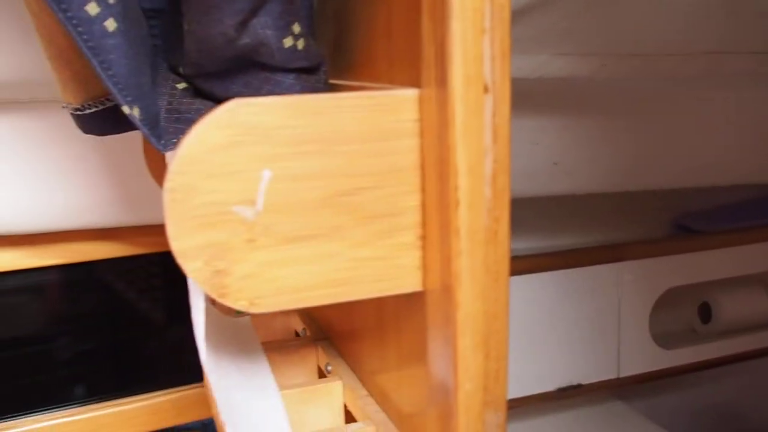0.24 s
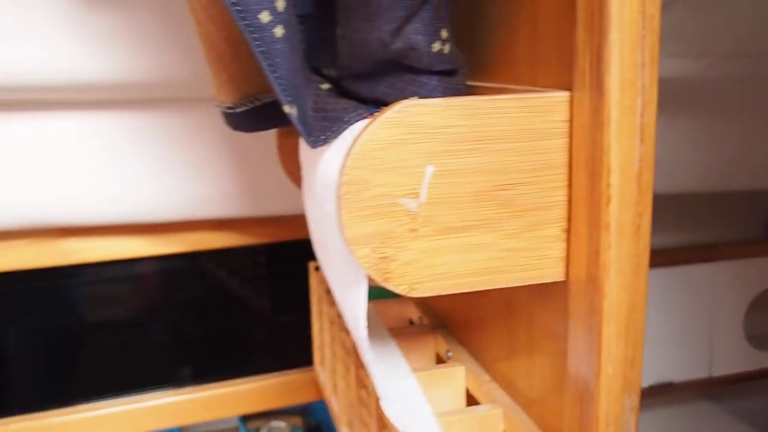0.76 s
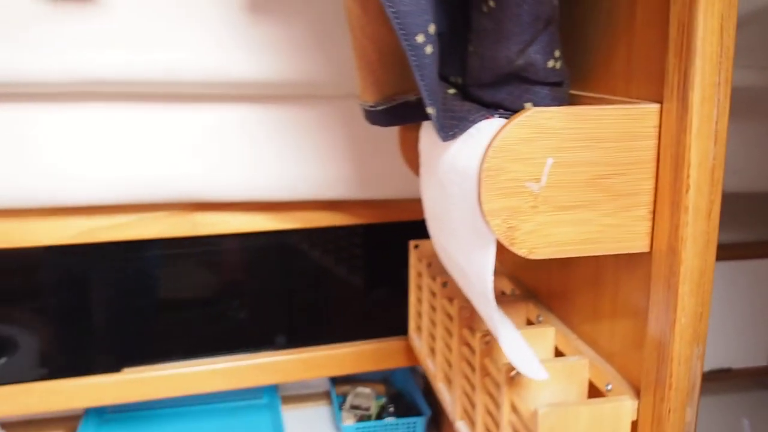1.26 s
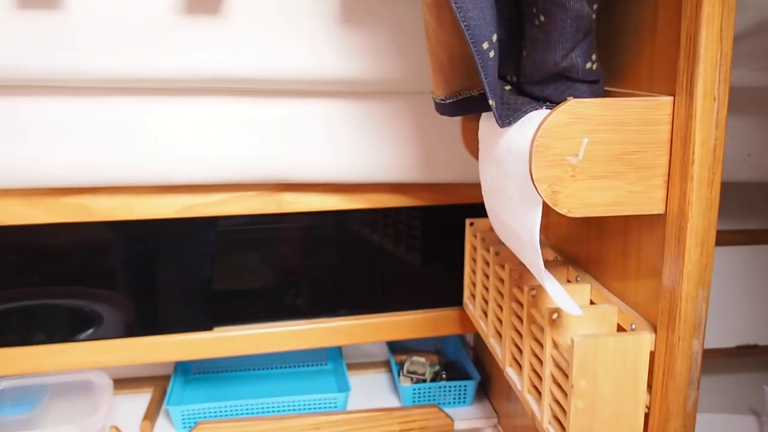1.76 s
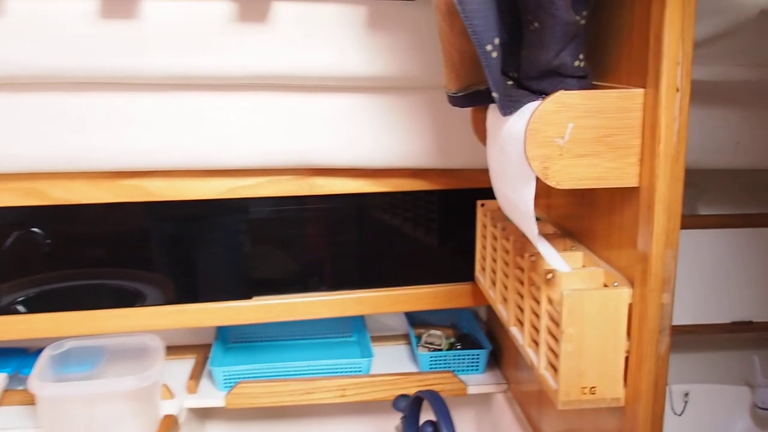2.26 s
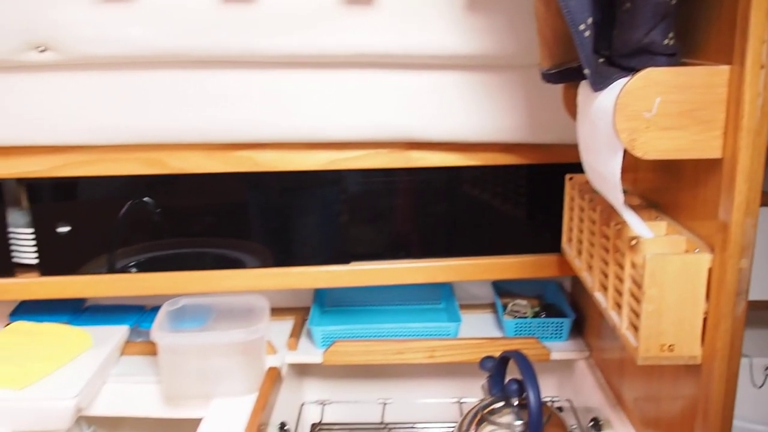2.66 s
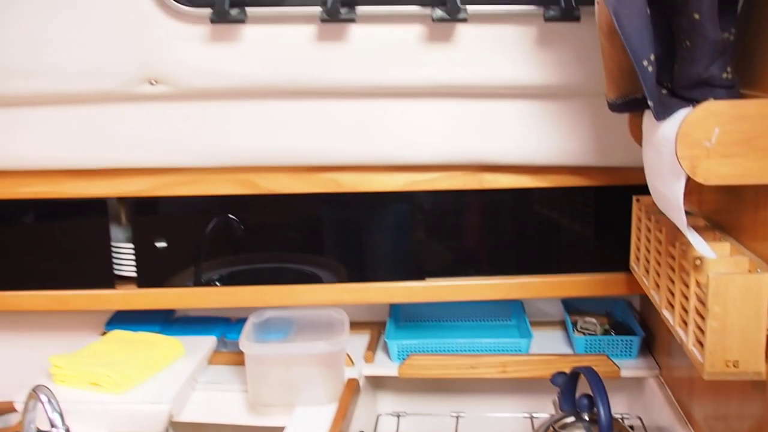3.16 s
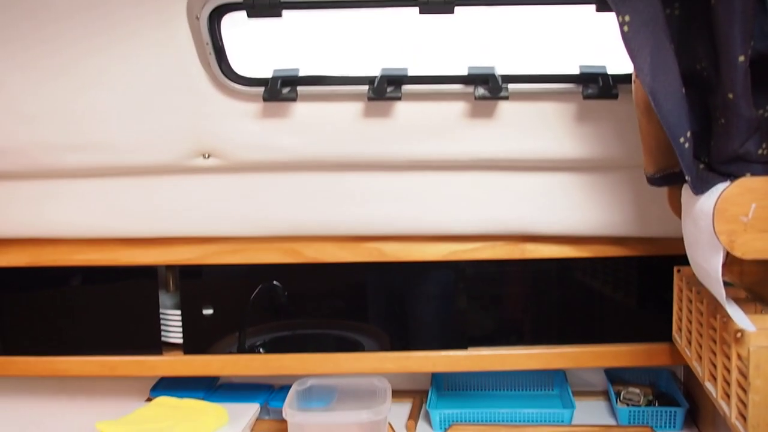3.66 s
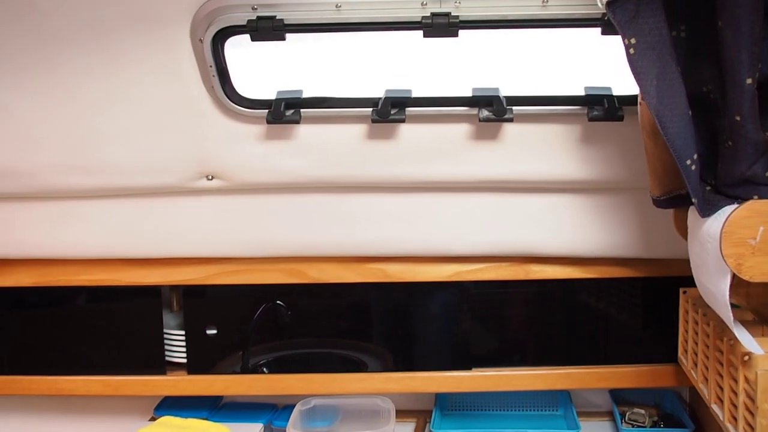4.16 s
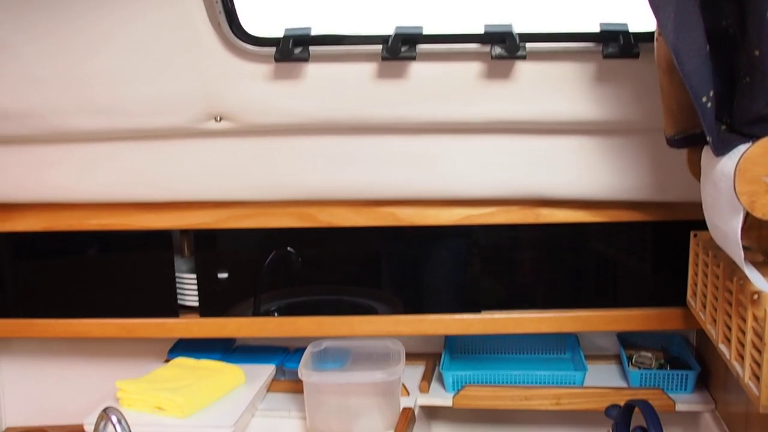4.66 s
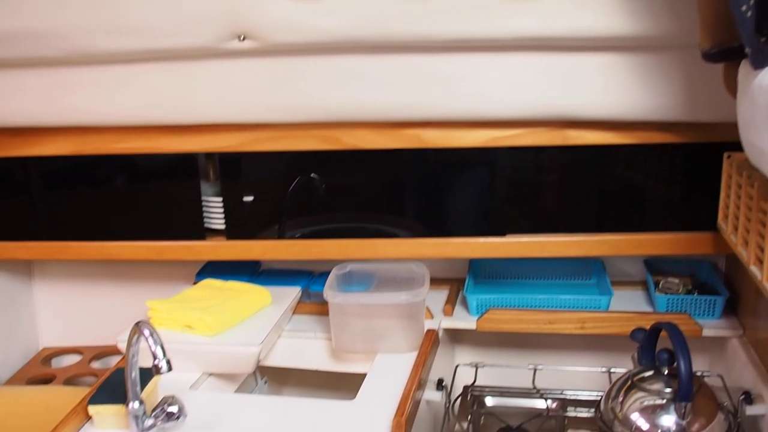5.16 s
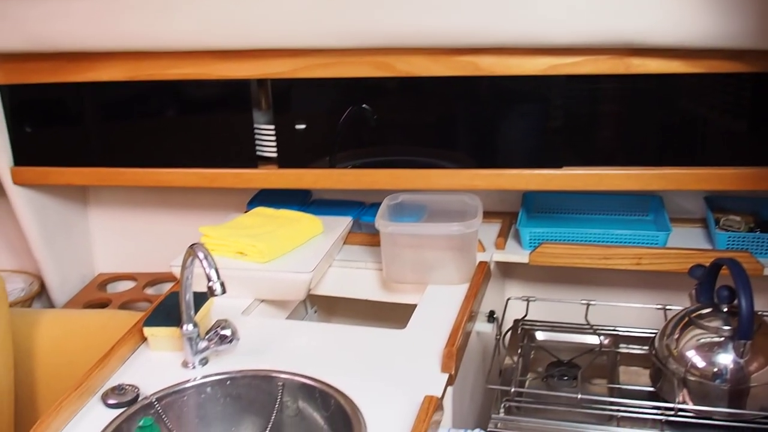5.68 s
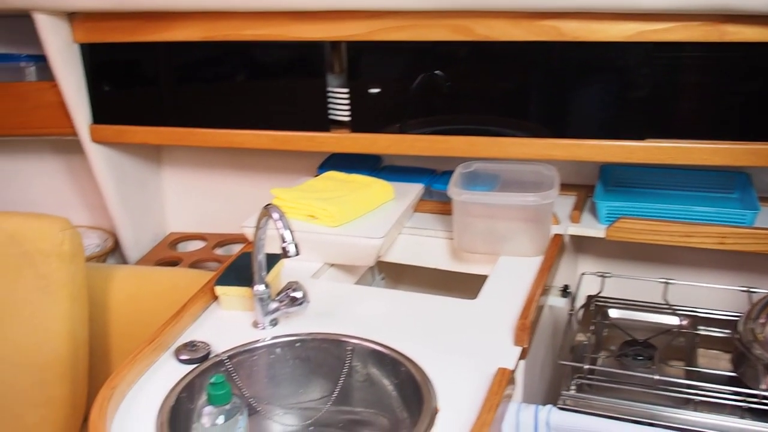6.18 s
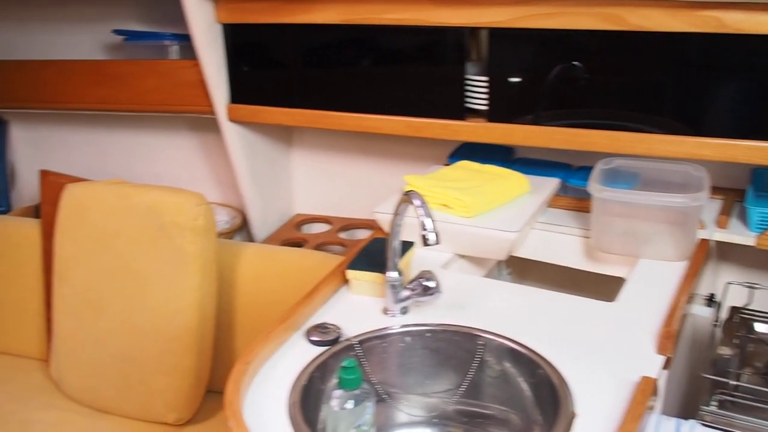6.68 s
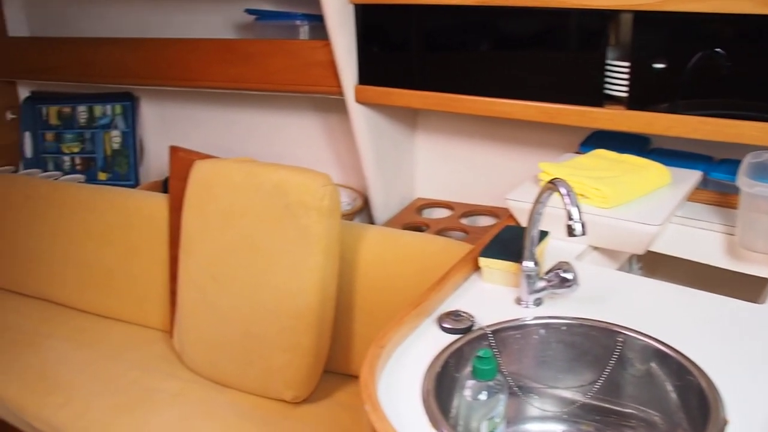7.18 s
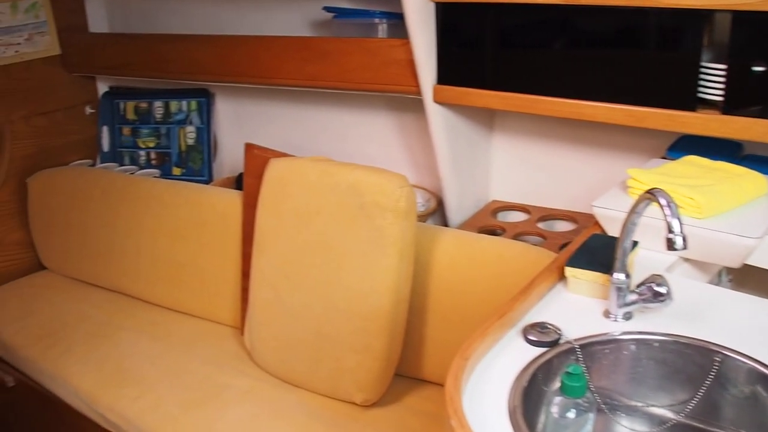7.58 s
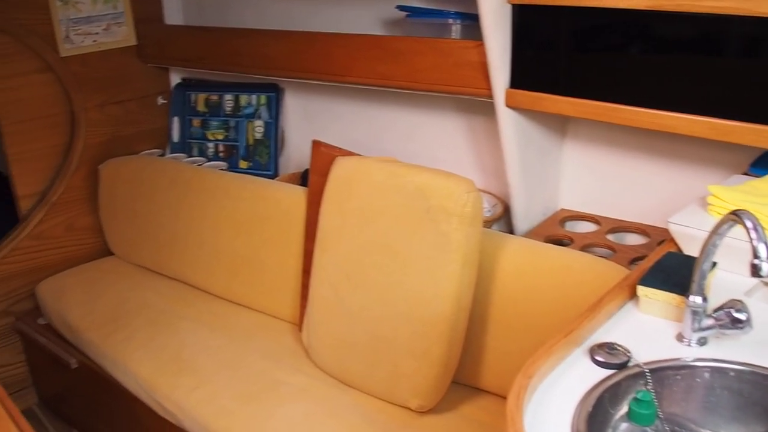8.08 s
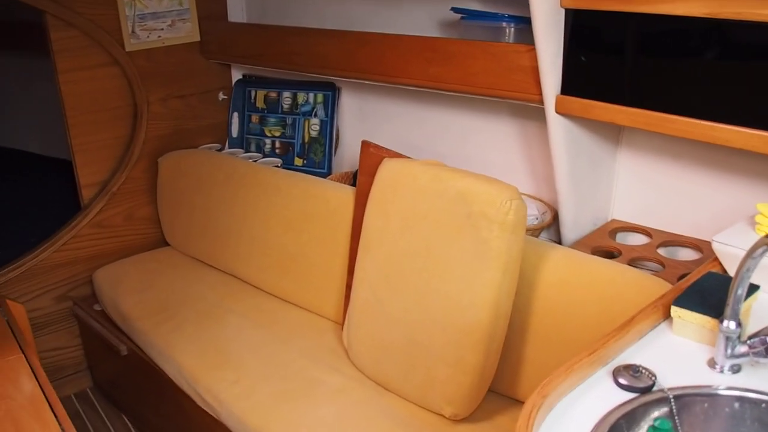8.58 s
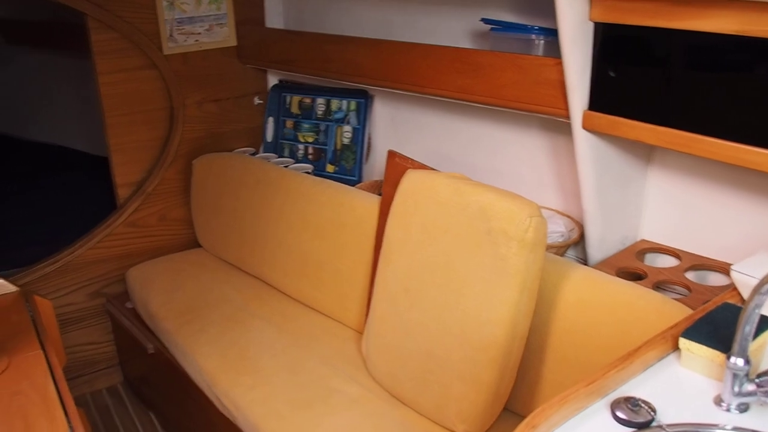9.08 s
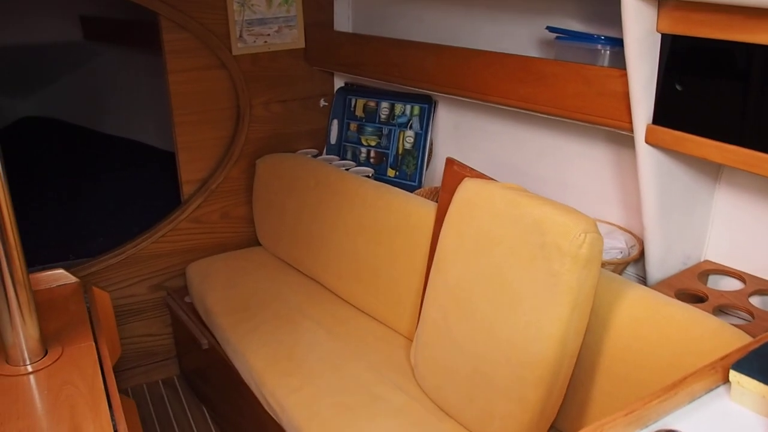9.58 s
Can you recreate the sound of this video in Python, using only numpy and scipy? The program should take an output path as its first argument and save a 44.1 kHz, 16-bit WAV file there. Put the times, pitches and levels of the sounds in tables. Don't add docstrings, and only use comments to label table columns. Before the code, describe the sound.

In a small boat cabin, a low steady drone with faint traffic wash and microphone hiss runs throughout. A loud, hard wood knock with a bright metal clack comes almost at once, followed by low floor thumps, a fainter bright knock, a heavier thump, then a dull loose clunk with rattle past the middle. Light finger taps, ticks and sleeve rustles are very close to the hand-held stereo microphone.

```python
import sys
import numpy as np
from scipy import signal
from scipy.fft import rfft, irfft
from scipy.io import wavfile
from scipy.ndimage import uniform_filter1d

SR = 44100
rng = np.random.default_rng(int(sys.argv[2]) if len(sys.argv) > 2 else 0)


def unload_wav(signal):
    wavfile.write(
        sys.argv[1],
        SR,
        np.round(np.clip(np.atleast_2d(signal).T, -1, 1) * 32767).astype(np.int16),
    )


def linear_from_db(decibels):
    return 10 ** (np.asarray(decibels, float) / 20)


N = 433944
PORT_GAP_S, NEAR_GAP_S = 0.00017, 1.5e-4
LEFT_LAG_S = 6e-5


def evened(x):
    return x / np.sqrt(np.mean(abs(x) ** 2) + 1e-20)


def read(points, hz):
    f, value = np.transpose(points)
    return np.interp(np.log(hz + 1), np.log(f + 1), value)


def add(mix, s, sound):
    part = mix[:, round(s * SR):][:, :sound.shape[1]]
    part += sound[:, :part.shape[1]]


def peaks(modes, hz):
    power = sum(linear_from_db(db) ** 2 / (1 + (2 * (hz - f) / width) ** 2) ** 2 for f, width, db in modes)
    return np.sqrt(power)


def diffuse(count, colour, lag_s=0., gap_s=PORT_GAP_S):
    hz = np.fft.rfftfreq(count, 1 / SR)
    a, b, c, d = rng.standard_normal((4, len(hz)))
    same = np.sinc(2 * hz * gap_s)
    left = a + 1j * b
    right = same * left + np.sqrt(1 - same ** 2) * (c + 1j * d)
    right = right * np.exp(2j * np.pi * hz * lag_s)
    return evened(irfft(np.array([left, right]) * colour(hz), count))


def knock(db, rise, snap_db, t60, crack, panels):
    t = np.arange(SR // 3) / SR
    swell = np.minimum(t / rise, 1) ** 2
    air = diffuse(len(t), lambda hz: linear_from_db(read(crack, hz)), gap_s=NEAR_GAP_S) * linear_from_db(-60 * t / t60)
    snap = diffuse(len(t), lambda hz: linear_from_db(read(crack, hz)) * hz, gap_s=NEAR_GAP_S)
    snap = snap * linear_from_db(snap_db - 60 * t / .035)
    ring = sum(linear_from_db(level - 60 * t / min(fade, .25)) * np.sin(-2 * np.pi * hz * (t - rise))
               for hz, level, fade in panels)
    ring_db = 1.3
    return linear_from_db(db - 6) * swell * (air + snap + linear_from_db(ring_db) * ring)


# (time [s], peak level [dB], rise [s], snap level [dB], tail t60 [s])
KNOCKS = [
    (.45, -.5, 0.0031, 2.5, .17),
    (2.298, -17, .0024, 2, 0.18),
    (5.5905, -13, 0.011, -25, .23),
]
# (frequency [Hz], level per Hz [dB])
CRACK_COLOURS = [
    [(88, -46), (150, -20), (360, -15), (511, -8), (916, -13), (1160, -9), (1610, -21), (2900, -12.5),
     (6540, -22), (12900, -30.5), (15700, -45)],
    [(210, -43), (350, -14), (601, -2), (827, -13), (1070, -2.5), (1660, -13), (1890, -10.5), (4190, -9.5),
     (6650, -18), (13400, -23), (15700, -35)],
    [(47, -36), (80, -6), (182, -7), (264, -1.5), (374, -9), (439, -11), (676, -13.5), (1000, -20),
     (1300, -57), (2200, -120)],
]
# (frequency [Hz], level [dB], t60 [s])
RINGING_PANELS = [
    [(155.6, -17.5, .2), (211, -19, .18), (512, -5.5, 0.19), (616, -7, 0.17), (687, -17, 0.15),
     (833, -16, 0.19), (1056, -11, .16), (1140, -10, 0.16), (1201, -8, 0.15), (1475, -15, 0.18),
     (1825, -16.5, 0.17), (2360, -27, .14), (2713, -16.5, 0.15), (3835, -10, 0.092)],
    [(462, -13, 0.18), (598, -14, .14), (705, -13, 0.17), (1055, -6, 0.13), (1074, -6, 0.12),
     (1535, -11, 0.12), (1910, -14, 0.16), (3010, -16, .16), (4140, -11, 0.073), (5200, -17, 0.13)],
    [(95, -.8, 0.18), (169, -7, .16), (274, -6, .25), (322, -9.5, 0.23), (442, -4, 0.19), (516, -1.5, 0.16),
     (669, -8, 0.21), (843, -15, 0.13)],
]


def knocks(mix):
    for (s, *blow), crack, panels in zip(KNOCKS, CRACK_COLOURS, RINGING_PANELS):
        add(mix, s, knock(*blow, crack, panels))


def contact(db, hz, width, t60, pan_db):
    t = np.arange(SR // 5) / SR
    burst = diffuse(len(t), lambda f: peaks([(hz, width, 0)], f)) * linear_from_db(-60 * t / t60)
    attack = np.minimum(t * hz / 2, 1)
    return linear_from_db(db - 10.5) * burst * attack * linear_from_db([[pan_db / 2], [-pan_db / 2]])


# (time [s], peak level [dB], centre [Hz], width [Hz], left-right [dB])
FITTINGS = [(.452, -7, 12000, 3000, .1), (.4532, -1, 3600, 1500, .1), (.4538, -3, 8200, 1500, .1),
            (.4538, -10, 13000, 2500, .1), (.456, -13, 11500, 1200, .1), (2.2995, -16, 13200, 2500, -1.9),
            (2.3013, -15, 13200, 1800, -1.9)]


def fittings():
    return [(s, db, hz, width, .016, pan) for s, db, hz, width, pan in FITTINGS]


# (time [s], peak level [dB], centre [Hz], t60 [s])
RATTLE = [(5.5925, -6, 420, .03), (5.6, -14, 950, 0.082), (5.597, -22.5, 1600, 0.13),
          (5.597, -26.5, 3300, 0.11), (5.598, -27.5, 5000, 0.085), (5.596, -33, 8700, 0.093),
          (5.597, -35, 11800, 0.11)]


def rattle():
    bounces = [(s + .009, db + 1.5, hz, t60) for s, db, hz, t60 in RATTLE if hz > 4000]
    return [(s, db, hz, min(0.69 * hz, 2800), t60, 0) for s, db, hz, t60 in RATTLE + bounces]


# (time [s], peak level [dB], centre [Hz], t60 [s])
THUMPS = [(0.911, -14, 115, 0.15), (.919, -29, 260, 0.091), (1.707, -10, 116, 0.14),
          (3.152, -4, 114, 0.068), (3.16, -17.5, 245, 0.15), (3.309, -14.5, 113, 0.25)]


def thumps():
    return [(s, db, hz, 0.43 * hz, t60, 0) for s, db, hz, t60 in THUMPS]


# (time [s], peak level [dB], left-right [dB])
TAPS = [(0.1864, -43, 0.5), (0.9194, -48, 1), (0.9656, -34, -5), (1.2254, -38, 0.1), (1.9037, -34, 0.1),
        (5.0444, -39, -4), (5.067, -34, -1.1), (5.1096, -23.5, -5), (5.1294, -32, -4), (5.1544, -34, 1.1),
        (5.1873, -28, -4), (5.241, -29, -4), (5.27, -34, -3.0), (5.3194, -36, -1.5), (5.3594, -34, -2.1),
        (5.4094, -42, -2.5)]


def taps():
    hz, width_hz, t60 = 2000, 2300, .055
    return [(s, db, hz, width_hz, t60, pan) for s, db, pan in TAPS]


# (time [s], peak level [dB], centre [Hz])
SCUFFS = [(.921, -37, 9000), (.965, -32.5, 7000)]


def scuffs():
    width_hz, t60 = 15000, 0.14
    return [(*row, width_hz, t60, 0) for row in SCUFFS]


# (time [s], peak level [dB], centre [Hz], width [Hz], left-right [dB])
TICKS = [(.2195, -43, 12540, 3000, -1.5), (.3265, -43, 9500, 4000, 4), (.345, -36, 9500, 6000, .1),
         (1.904, -35, 5970, 9000, 3), (2.02, -45, 12000, 5000, -2.5), (2.134, -46, 14000, 3000, -.5),
         (2.209, -33, 11500, 10000, -1.9), (4.678, -39, 13000, 5000, 6), (5.044, -42, 10500, 5000, -.9),
         (5.066, -38, 11000, 6000, .1), (5.119, -42, 10000, 3000, .1), (5.352, -43, 10000, 2500, 6),
         (5.3725, -32, 10300, 1500, -2.5), (6.219, -43, 9000, 6000, .6), (6.33, -46, 12500, 3000, -2)]


def ticks():
    return [(s, db, hz, width, 0.02, pan) for s, db, hz, width, pan in TICKS]


# (time [s], peak level [dB], centre [Hz], width [Hz], t60 [s])
PINGS = [(3.677, -30, 1520, 60, .07)]


def pings():
    return [(*row, 0) for row in PINGS]


# (peak time [s], length [s], weave level [dB], nap level [dB])
STROKES = [(0.703, .2, -53.5, -57.5), (1.4, .2, -72, -65), (1.635, .12, -60, -65), (3.558, .4, -57.5, -61),
           (4.09, .15, -62, -69), (4.55, .35, -60, -72), (4.8, 0.38, -53, -62), (4.998, .25, -59, -69),
           (6.017, 0.25, -47.5, -52), (6.2, 0.45, -56.5, -59), (6.638, 0.71, -56.5, -59),
           (7.03, .15, -67, -73), (9.85, .05, -60, -48)]
# (frequency [Hz], level [dB])
WEAVE = [(2000, -24), (4000, -11), (5500, -6.5), (7300, -10.5), (8300, -5.5), (9300, -8), (11000, -30)]
# (frequency [Hz], level [dB])
NAP = [(8000, -9), (10500, 0), (12300, 3), (13500, -2), (16000, -15)]


def sleeve():
    t, power = np.arange(N) / SR, np.zeros((2, N))
    rise = 0.51
    for s, length, weave_db, nap_db in STROKES:
        away = np.where(t < s, (s - t) / rise, (t - s) / (1 - rise)) / length
        stroke = linear_from_db(-13 * np.minimum(away, 4) ** 1.6)
        power += (linear_from_db([[weave_db], [nap_db]]) * stroke) ** 2
    threads = linear_from_db(1.8 * evened(uniform_filter1d(rng.standard_normal((2, N)), 500)))
    level = np.sqrt(power) * threads
    return sum(a * diffuse(N, lambda hz: linear_from_db(read(colour, hz))) for a, colour in zip(level, (WEAVE, NAP)))


# (closest time [s], half-width [s], tyre level [dB], wash level [dB])
PASSES = [(2.3, 0.58, -55.5, -53), (3.7, 0.64, -48, -49), (5.25, .5, -50, -49), (6.6, 0.94, -53.5, -52),
          (8.3, 0.49, -54.5, -51.5), (9.3, .6, -45.5, -56)]


def traffic(levels_db, far_db):
    t = np.arange(N) / SR
    near = sum(linear_from_db(db) ** 2 / (1 + ((t - s) / half) ** 2)
               for (s, half, *_), db in zip(PASSES, levels_db))
    return np.sqrt(near + linear_from_db(far_db) ** 2)


# (frequency [Hz], width [Hz], level [dB])
ROAD_MODES = [(900, 92, -4.5), (987, 140, 0), (1104, 107, -5.5)]


def road():
    level = traffic([tyre_db for _, _, tyre_db, _ in PASSES], -59.5)
    return level * diffuse(N, lambda hz: peaks(ROAD_MODES, hz), LEFT_LAG_S)


# (time [s], level against its average [dB])
BOAT_SWELL = [(0.0, -9.5), (0.55, -5.5), (0.95, -1), (1.551, 0), (1.9, 2), (2.5, 1.5), (3.15, 5.5),
              (3.5, 1.5), (4.3, 1), (4.9, 0.5), (5.4, 2.5), (5.8, 2), (7.2, 0), (8.3, 0.5), (8.7, -2),
              (9.84, 1)]
# (average level [dB], share of the boat's swell reaching it [ratio])
HULL_LAYERS = [
    (-37.5, 0.88),
    (-39.5, 0.28),
    (-44.5, 0.13),
]
# (frequency [Hz], width [Hz], level [dB])
RUMBLE_MODES = [(49.7, 6.7, -13), (56.3, 6.4, -11), (82.7, 27, -14.5), (101.3, 16.6, -8), (113, 17.3, -7)]
DRONE_MODES = [(139.2, 15.5, 2.5), (165.5, 28.5, 2), (203.4, 46.5, 0.5), (252, 79, -11)]
ROAR_MODES = [(331, 67, -3.5), (401, 21, 2), (436, 150, 2.5), (476, 33, 8), (561, 140, -0.5), (612, 76, 0),
              (669, 30, 5.5), (752, 200, -2)]
WASH_MODES = [(1118, 220, -1.5), (1398, 290, 0), (1890, 600, -5), (2880, 1500, -10)]


def hull():
    swell_db = np.interp(np.arange(N) / SR, *np.transpose(BOAT_SWELL))
    levels = [linear_from_db(db + share * swell_db) for db, share in HULL_LAYERS]
    levels.append(traffic([wash_db for _, _, _, wash_db in PASSES], -57))
    layers = zip(levels, (RUMBLE_MODES, DRONE_MODES, ROAR_MODES, WASH_MODES))
    return sum(level * diffuse(N, lambda hz: peaks(modes, hz), LEFT_LAG_S) for level, modes in layers)


def scene():
    mix = hull() + road() + sleeve()
    knocks(mix)
    for s, *row in fittings() + rattle() + thumps() + taps() + scuffs() + ticks() + pings():
        add(mix, s, contact(*row))
    return mix


def gain_control(x):
    power_db = 10 * np.log10(abs(uniform_filter1d((x ** 2).mean(0), 400)) + 1e-12)
    fall = np.arange(N) * 19.4 / SR
    held_db = np.maximum.accumulate(power_db + fall) - fall
    over_db = np.maximum(held_db + 15.5, 0)
    return x / linear_from_db(0.36 * uniform_filter1d(over_db, 200))


def widen(x):
    share = 0.0097
    return (x - share * x[::-1]) / (1 - share) * linear_from_db([[-.35], [.35]])


# (frequency [Hz], width [Hz], depth [dB])
NOTCHES = [(1650, 54, 5.5), (6570, 560, 12.5), (10430, 860, 12)]


def housing(x):
    hz = np.fft.rfftfreq(N, 1 / SR)
    cavity = linear_from_db(-sum(db / (1 + (2 * (hz - f) / width) ** 2) for f, width, db in NOTCHES))
    low_cut_hz, edge_hz = 32, 15760
    band = (hz < edge_hz) * hz ** 2 / np.hypot(hz ** 2, low_cut_hz ** 2)
    return irfft(rfft(x) * cavity * band, N)


# (frequency [Hz], level [dB])
HISS = [(300, 4), (1500, -1), (3000, -2), (4500, -4.5), (6000, -7), (8000, -12), (12000, -16.5),
        (16000, -20.5)]


def hiss():
    return linear_from_db(-48.5) * diffuse(N, lambda hz: linear_from_db(read(HISS, hz)), gap_s=1.)


# (frequency [Hz], rms level [dB])
WHINES = [(13501, -90), (15299, -92)]


def whines():
    t = np.arange(N) / SR
    return sum(linear_from_db(db) * np.sqrt(2) * np.sin(2 * np.pi * f * t) for f, db in WHINES)


def roll_off(x):
    return signal.sosfilt(signal.butter(12, 16310, fs=SR, output="sos"), x)


def record(dry):
    x = gain_control(dry + hiss())
    x = housing(widen(x)) + whines()
    offset = -.0028
    return roll_off(np.clip(x + offset, -1, 1))


dry = scene()
out = record(dry)
unload_wav(out)
```